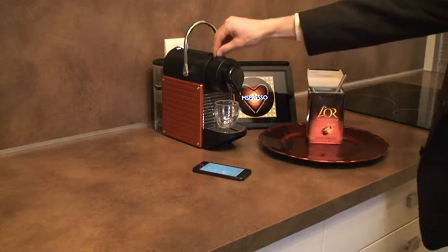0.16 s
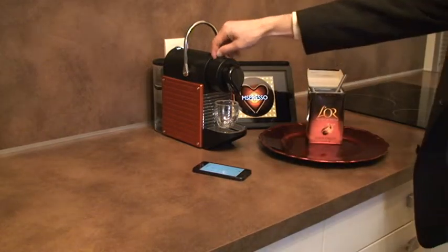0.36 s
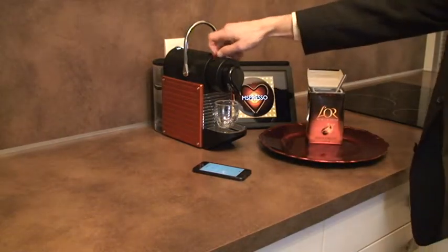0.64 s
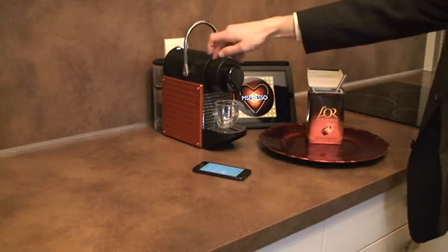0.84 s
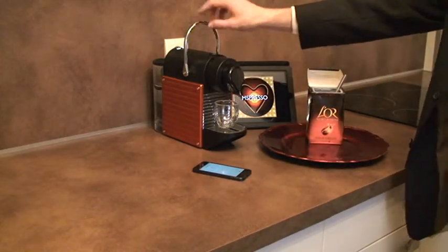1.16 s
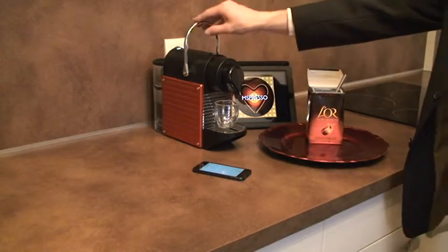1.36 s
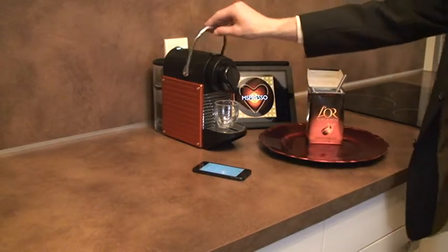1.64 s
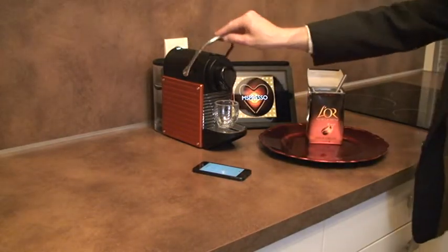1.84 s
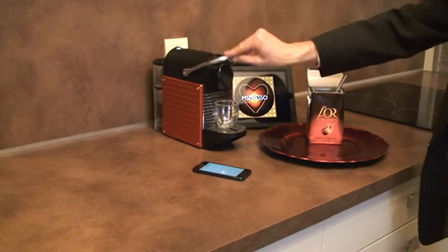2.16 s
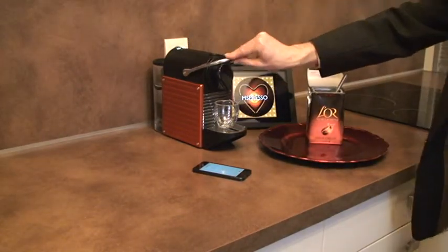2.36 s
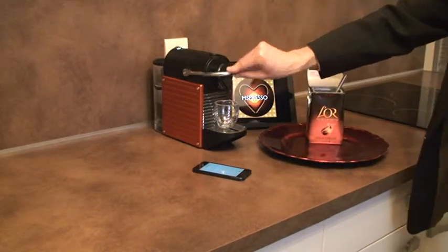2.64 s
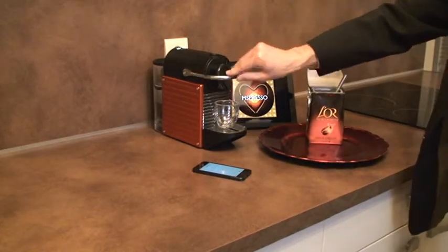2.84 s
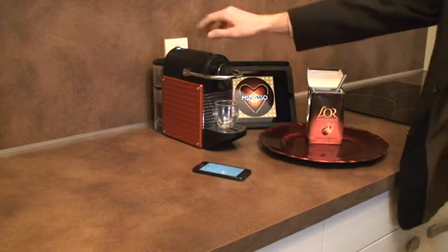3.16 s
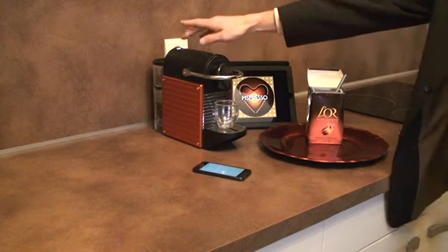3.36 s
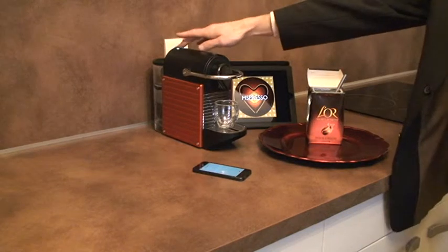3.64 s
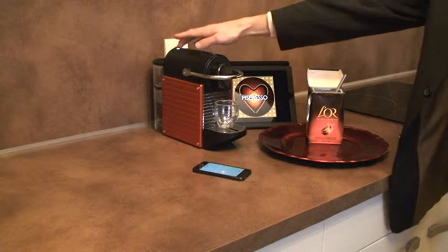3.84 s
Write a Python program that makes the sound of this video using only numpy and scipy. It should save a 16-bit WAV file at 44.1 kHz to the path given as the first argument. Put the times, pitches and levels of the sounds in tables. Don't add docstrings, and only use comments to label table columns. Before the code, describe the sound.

A capsule coffee machine clicks and clacks on a kitchen counter. Tiny bright ticks at 0.2 s, a crisp click at 0.44, faint ticks to 1.0, then the loudest double clack at 1.43. Sliding and hollow plastic knocks run 1.7-2.25, the lever shuts with a ringing clunk at 2.73, and clicks follow at 3.86 and 3.98. Short hard-room echo, low hiss, faint fridge and motor hum.

```python
import sys
import numpy as np
from scipy import signal
from scipy.fft import rfft, irfft
from scipy.io import wavfile
from scipy.ndimage import uniform_filter1d

SR = 44100
rng = np.random.default_rng(int(sys.argv[2]) if len(sys.argv) > 2 else 0)


def master_out(mix):
    frames = np.transpose(np.atleast_2d(mix))
    ceiling = np.clip(frames, -1, 1)
    pcm = np.round(ceiling * 32767).astype(np.int16)
    wavfile.write(sys.argv[1], SR, pcm)


def volts(x):
    e = np.asarray(x, float) / 20
    return 10 ** e


N = 176400


def shape(x, table):
    hz, db = np.array(table).T
    f = np.maximum(np.arange(x.shape[-1] // 2 + 1) * SR / x.shape[-1], 1)
    gain = volts(np.interp(np.log(f), np.log(hz), db, left=-90))
    return irfft(rfft(x) * gain, x.shape[-1])


def unit(x):
    return x / np.sqrt(np.mean(x ** 2))


def band(x, hz, width_hz):
    b, a = signal.iirpeak(min(hz, .4 * SR), hz / width_hz, fs=SR)
    return signal.lfilter(b, a, x)


def add(out, x, start_s):
    i = int(start_s * SR)
    out[i:i + len(x)] += x[:N - i]


def walk(rate_hz):
    hold = int(SR / rate_hz)
    steps = np.repeat(rng.standard_normal(N // hold + 1), hold)
    return 1.67 * uniform_filter1d(uniform_filter1d(steps, hold), hold)[:N]


def even(x, bins):
    spec = rfft(x, 2 * len(x))
    power = np.abs(spec) ** 2 + 1e-30
    broad, fine = uniform_filter1d(power, size=40 * bins), uniform_filter1d(power, size=bins)
    return irfft(spec * np.sqrt(broad / fine))[:len(x)]


def floor():
    # hz, density_db (dB per Hz)
    air = [(22, -18), (65, -11), (170, -14), (900, -17.5), (2500, -27), (7500, -36), (13000, -40),
           (15800, -39.5)]
    # pitch_hz, width_hz, level_db
    appliances = [(96.3, 1.8, -71.5), (224, 5.9, -72), (893, 12, -73.5), (1674, 68, -80.5),
                  (2502, 13, -81.5)]
    x = volts(-61.5) * unit(shape(rng.standard_normal(N), air)) * volts(0.2 * walk(3.24))
    for hz, width_hz, db in appliances:
        x = x + volts(db + 2 * walk(3.8)) * unit(band(rng.standard_normal(N), hz, width_hz))
    return x


def tone(table, wobble_db):
    s, hz, db = np.array(table).T
    t = np.arange(N) / SR
    pitch_hz = np.interp(t, s, hz) * (1 + 0.00722 * walk(6.5))
    phase = 2 * np.pi * np.cumsum(pitch_hz) / SR
    level_db = np.interp(t, s, db) + wobble_db * walk(8.46)
    return np.sqrt(2) * volts(level_db) * np.sin(phase)


def hum():
    # start_s, level_db
    fridge = [(0, -67), (.3, -58.5), (.45, -69), (.58, -59.5), (.68, -64.5), (.95, -54), (1.15, -58),
              (1.3, -59.5), (1.9, -62.5), (2.5, -62.5), (2.97, -55.5), (3.1, -64.5), (4, -64.5)]
    return tone([(s, 50.6, db) for s, db in fridge], 0.59)


def engine():
    # start_s, pitch_hz, level_db
    course = [(0, 47, -71), (1.2, 52.6, -101), (1.8, 61.45, -65), (2.3, 69.2, -70), (2.75, 77.8, -67),
              (2.95, 61.2, -55), (3.2, 51.8, -80), (4, 46, -89)]
    return tone(course, 3.4)


def motor():
    # start_s, pitch_hz, level_db
    course = [(0, 175.4, -66), (.5, 180, -71), (1.0, 178, -76), (1.25, 177, -67.5), (1.9, 182.8, -68.5),
              (2.72, 181.7, -69), (2.87, 180.7, -56), (3.2, 180, -66.5), (3.35, 165, -75),
              (3.8, 165.3, -63), (4, 168, -66.5)]
    return tone(course, 2.35)


def rubs():
    # start_s, length_s, level_db, colour_hz
    strokes = [(0.15, 0.058, -66, 2920), (0.6, 0.25, -70, 220), (0.71, 0.21, -71, 1210),
               (0.914, 0.1, -68.5, 3100), (1.609, 0.31, -63.5, 4100), (1.654, 0.22, -60.5, 700),
               (1.705, 0.26, -58, 183), (1.86, 0.1, -61, 450), (1.861, 0.19, -63.5, 3380),
               (1.948, 0.097, -64, 600), (2.098, 0.18, -58.5, 110), (2.138, 0.2, -62.5, 259),
               (2.545, 0.19, -61, 300), (2.598, 0.34, -59.5, 119), (2.716, 0.025, -55, 5000),
               (2.736, .22, -61, 500), (3.049, 0.35, -72.5, 5900), (3.974, 0.025, -50.5, 2340)]
    out = np.zeros(N)
    grain = rng.standard_normal(N) * volts(2 * walk(120) + 2 * walk(25))
    for s, length_s, db, hz in strokes:
        i, n = int(s * SR), int(length_s * SR)
        rasp = band(band(grain[i:i + n], hz, 1.3 * hz), hz, 3.6 * hz)
        add(out, volts(db) * unit(rasp) * np.hanning(n) ** 0.51, s)
    return out


def burst(noise, length_s):
    return noise * np.exp(-np.arange(len(noise)) / SR / length_s)


def knocks():
    # start_s, level_db, centre_hz, length_s
    blows = [(.17, -54.5, 650, 0.023), (0.2309, -39.5, 650, 0.0057), (0.241, -55, 144, 0.0081),
             (0.756, -60.5, 814, 0.089), (1.368, -48.5, 1030, 0.021), (1.431, -43, 1300, .004),
             (1.445, -37.5, 1250, 0.014), (1.46, -45, 775, 0.0031), (1.719, -59.5, 170, 0.027),
             (1.741, -51, 800, 0.0064), (1.882, -45, 650, 0.014), (1.913, -43.5, 540, 0.0048),
             (1.963, -43.5, 650, 0.0017), (1.986, -47.5, 690, 0.018), (2.142, -45, 1010, 0.012),
             (2.154, -44.5, 422, 0.0076), (2.173, -54, 800, 0.013), (2.209, -49.5, 490, 0.011),
             (2.245, -56, 278, .01), (2.7292, -37.5, 800, 0.0078), (2.733, -38.5, 507, 0.005),
             (2.735, -46.5, 130, 0.0036), (2.744, -36.5, 626, 0.0028), (2.759, -37, 305, 0.0032),
             (3.858, -50, 1347, 0.0038), (3.987, -39, 960, 0.012), (3.988, -42.5, 380, 0.0068),
             (3.99, -41.5, 1500, 0.005)]
    # pitch_hz, level_db, t60_s
    modes = [(117, 1.5, 0.043), (155, -3.5, 0.046), (220, -7.5, 0.07), (276.7, -1, 0.13),
             (377.5, -0.5, 0.1), (443, -7, 0.23), (610, 2.5, 0.056), (650, 7, 0.063), (769, 11.5, 0.02),
             (851, -3.5, 0.092), (977, 2.5, 0.064), (1155, 15, 0.011), (1290, 8, 0.017),
             (1790, 21.5, 0.0077)]
    spread_octaves = 0.86
    out, t = np.zeros(N), np.arange(8192) / SR
    hz, db, t60_s = np.array(modes).T[:, :, None]
    for (s, level_db, centre_hz, length_s), n in zip(blows, rng.standard_normal((40, 2048))):
        gain = volts(db - 5.8 * (np.log2(hz / centre_hz) / spread_octaves) ** 2)
        detuned_hz = hz * (1 + 0.017 * n[-len(hz):, None])
        partials = gain * np.sin(2 * np.pi * detuned_hz * t) * 1000. ** (-t / t60_s)
        x = signal.fftconvolve(even(burst(n, length_s), bins=5), partials.sum(axis=0))
        add(out, volts(level_db) * 2 * x / np.abs(x).max(), s)
    return shape(out, [(40, -40), (100, 0), (20000, 0)])


def clicks():
    # start_s, level_db, colour_hz, width_share (bandwidth over colour)
    contacts = [(0.1994, -35, 9100, 0.2), (0.2024, -42, 9300, .3), (0.208, -29.5, 9600, 0.21),
                (.214, -36, 9400, .4), (0.224, -28, 9200, 0.073), (0.2313, -30, 6000, 0.72),
                (0.4424, -22.5, 5700, 0.56), (0.4428, -24.5, 10700, 0.66), (0.449, -36, 6000, 1.8),
                (0.7287, -49.5, 9000, .9), (0.753, -40, 2920, 0.65), (0.997, -42, 2940, 0.67),
                (1.3672, -29.5, 4070, 2.2), (1.373, -36, 4000, 1.5), (1.4286, -14.5, 5460, 0.67),
                (1.4336, -29, 5900, 0.6), (1.4465, -12, 2320, 0.49), (1.4485, -22.5, 5660, 0.5),
                (1.4515, -23, 1990, 1.5), (1.4554, -27, 11000, 0.57), (1.4622, -26, 6050, 0.68),
                (1.469, -27, 6000, 0.59), (1.729, -27, 6860, 0.35), (1.8814, -34.5, 3060, 0.78),
                (1.963, -26, 2400, 0.27), (2.142, -21, 4900, 0.81), (2.15, -40, 5300, 0.49),
                (2.156, -35.5, 8100, 0.62), (2.6088, -44.5, 7760, 0.91), (2.7295, -18.5, 3600, 0.7),
                (2.7335, -34, 5400, 0.58), (2.7362, -41, 4500, 0.8), (2.742, -30.5, 5000, 1.5),
                (3.8556, -21.5, 2300, 0.44), (3.8647, -33, 6300, 0.18), (3.976, -45, 3000, 0.6),
                (3.9825, -29, 2500, 0.63), (3.986, -34.5, 6000, 0.8), (3.992, -44, 2500, 0.71)]
    scatter, lag_samples = 0.46, (3, 34)
    out = np.zeros(N)
    for (s, db, hz, share), u in zip(contacts, rng.random((60, 5))):
        x = np.eye(1, 1024)[0]
        for lag in np.interp(u, (0, 1), lag_samples).astype(int):
            a = np.r_[1, np.zeros(lag - 1), -scatter]
            x = signal.lfilter(a[::-1], a, x)
        edge = 0.13 * hz / 6000 * np.diff(x, prepend=0)
        add(out, volts(db + 5) * (2 * band(x, hz, share * hz) + edge), s)
    return out


def rings():
    # start_s, level_db, pitch_hz, t60_s
    parts = [(0.202, -46, 1310, 0.043), (0.209, -40, 1298, 0.05), (0.2125, -36, 1298, 0.03),
             (0.445, -52, 1310, 0.05), (.445, -81, 3790, 1), (1.704, -56, 1350, .05),
             (1.73, -48, 1290, 0.045), (1.885, -48, 1220, .045), (1.886, -47, 620, .08),
             (1.905, -51, 340, .1), (1.966, -47, 730, .2), (1.968, -49, 590, .1), (1.998, -61, 6700, 0.037),
             (2.144, -47, 870, .06), (2.144, -49, 1190, .05), (2.16, -50, 340, .08), (2.732, -45, 850, .08),
             (2.733, -38, 145, .1), (2.735, -43, 360, .1), (2.74, -41, 110, .3), (2.74, -43, 281, .2),
             (2.745, -42, 595, .14), (2.75, -47, 970, .12)]
    # start_s, level_db, pitch_hz, t60_s
    wire = [(.231, -53, 6430, 0.17), (2.74, -59, 10110, .25), (2.755, -55, 6293, 0.3)]
    rise_s = 0.00037
    out, t = np.zeros(N), np.arange(16384) / SR
    flutter = volts(2 * walk(120))
    for (s, db, hz, t60_s), n in zip([*parts, *wire], rng.standard_normal((30, len(t) // 128))):
        drift = np.cumsum(.006 * np.repeat(n, 128)) / SR
        phase = 2 * np.pi * hz * (t + drift)
        pair = np.sin(phase) + .4 * np.sin(1.009 * phase)
        add(out, volts(db) * pair * 1000. ** (-t / t60_s) * (1 - np.exp(-t / rise_s)), s)
    return out * flutter


def room(x):
    # hz, t60_s
    decays = [(150, 0.58), (500, 0.27), (1500, 0.31), (4000, 0.3), (8000, 0.28), (14000, 0.16)]
    gap_s, early_db, early_t60_s = 0.0013, 0, 0.089
    t, ir = np.arange(SR // 2) / SR, 0
    spec = rfft(rng.standard_normal(len(t)))
    log_hz = np.log(1 + 2 * np.arange(len(t) // 2 + 1))
    hz, t60_s = np.array(decays).T
    for share, decay_s in zip(np.eye(len(hz)), t60_s):
        echoes = irfft(spec * np.interp(log_hz, np.log(hz), share), len(t))
        ir = ir + echoes * 1000. ** (-t / decay_s)
    early = 1 + volts(early_db) * 1000. ** (-t / early_t60_s)
    ir = even(ir * np.clip(t / gap_s, 0, 1) ** 2 * early, bins=7)
    return signal.fftconvolve(x, ir / np.sqrt(np.sum(ir ** 2)))[:N]


def scene():
    # hz, level_db
    side_colour = [(50, -26), (125, -21), (300, -11), (1000, -9.5), (4500, -11.5), (8000, -11.5),
                   (10800, -10), (12000, -22)]
    room_db, ring_direct = 1, 0.74
    ring = rings()
    near = clicks() + knocks() + rubs() + ring_direct * ring
    lines = hum() + engine() + motor()
    mid = near + (1 - ring_direct) * ring + volts(room_db) * room(near) + floor() + lines
    side = shape(volts(room_db - 2.0) * room(near) + volts(9.0) * floor() + 0.048 * near, side_colour)
    return np.array([mid + side, mid - side])


def roll_off(x):
    return signal.sosfilt(signal.butter(12, 16520, fs=SR, output="sos"), x)


def record(dry):
    low_pass = signal.ellip(6, .3, 25, 15750, fs=SR, output="sos")
    mix = signal.sosfilt(low_pass, dry)
    return roll_off(mix)


dry = scene()
out = record(dry)
master_out(out)
```